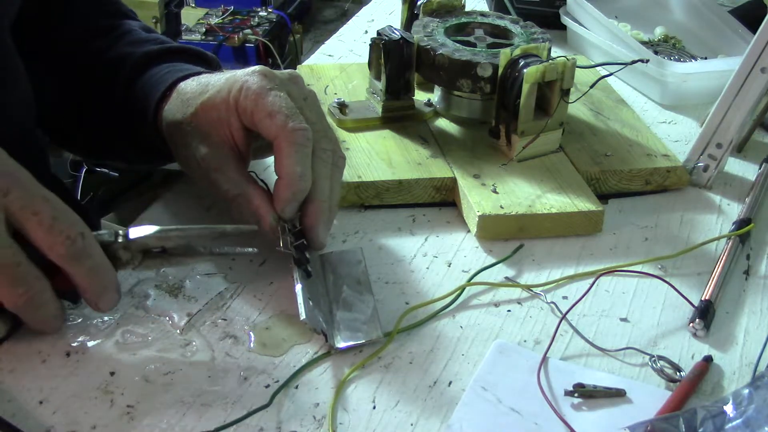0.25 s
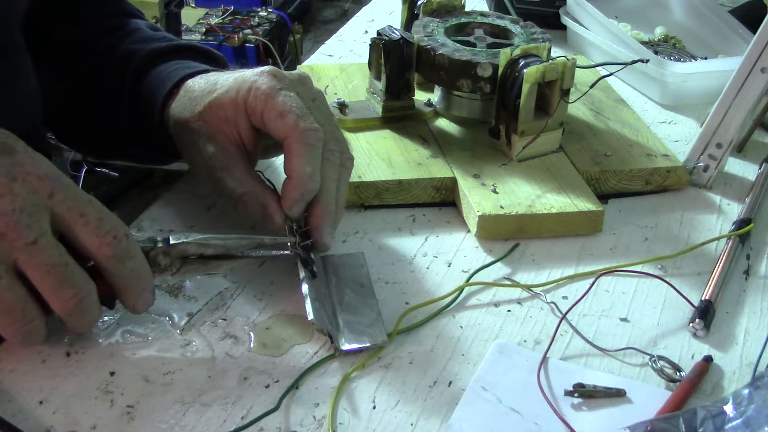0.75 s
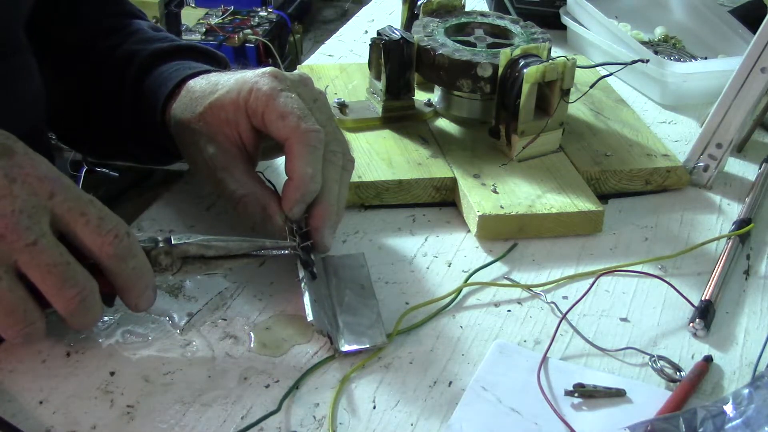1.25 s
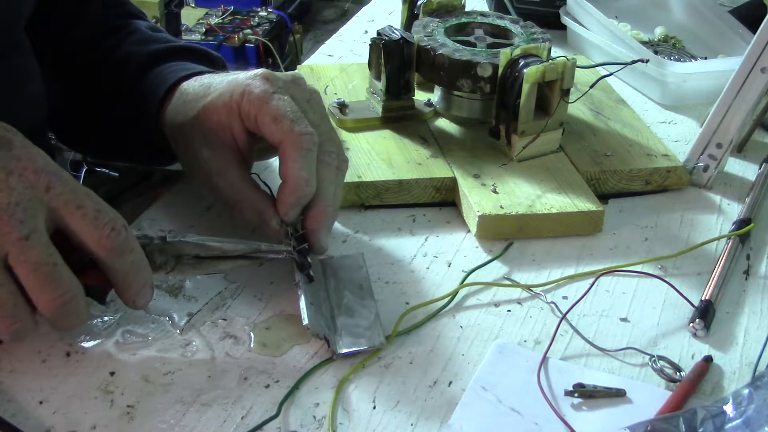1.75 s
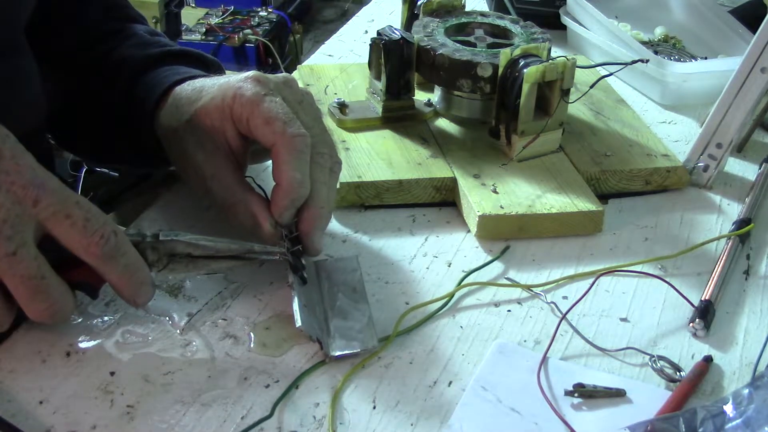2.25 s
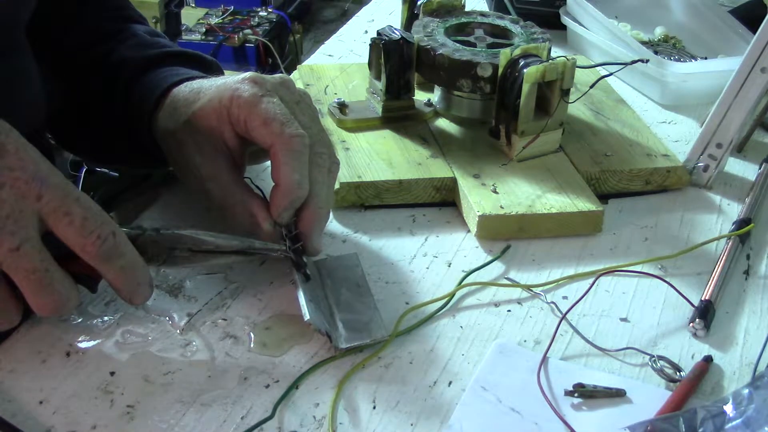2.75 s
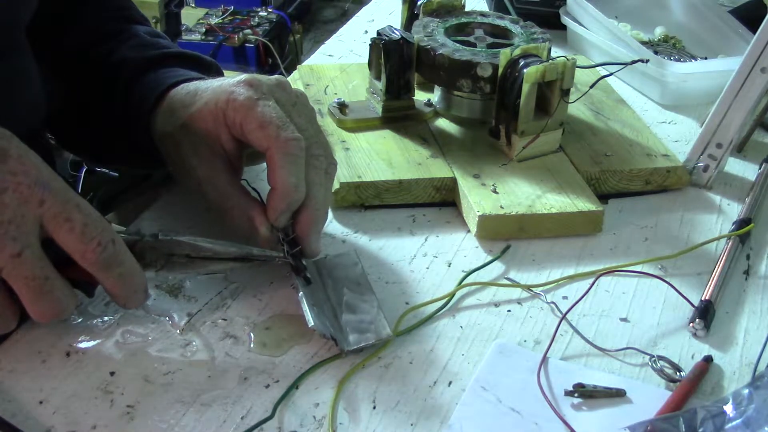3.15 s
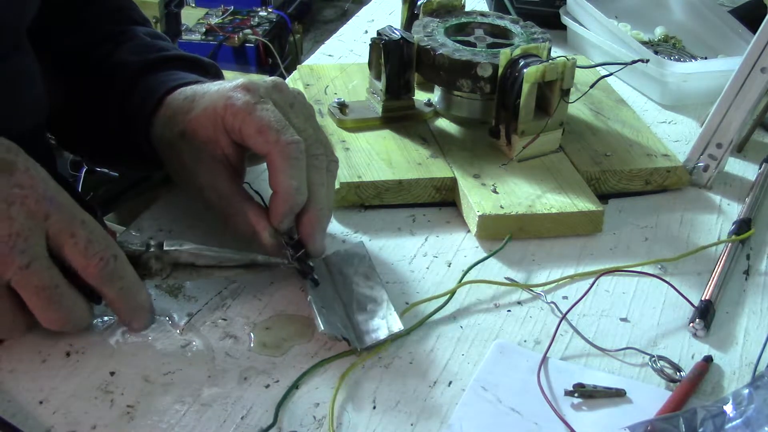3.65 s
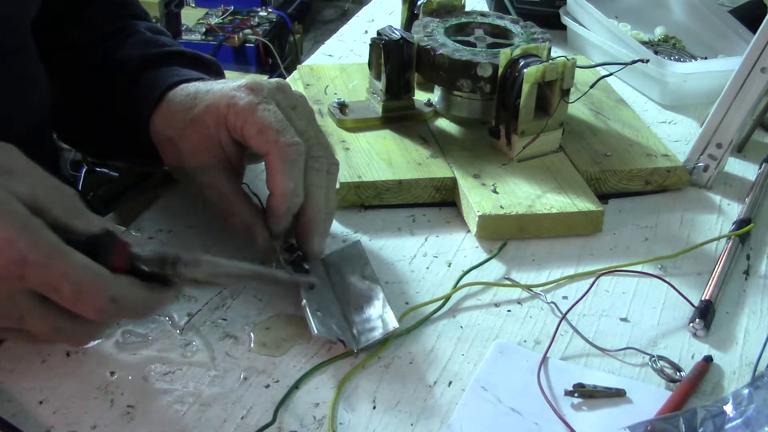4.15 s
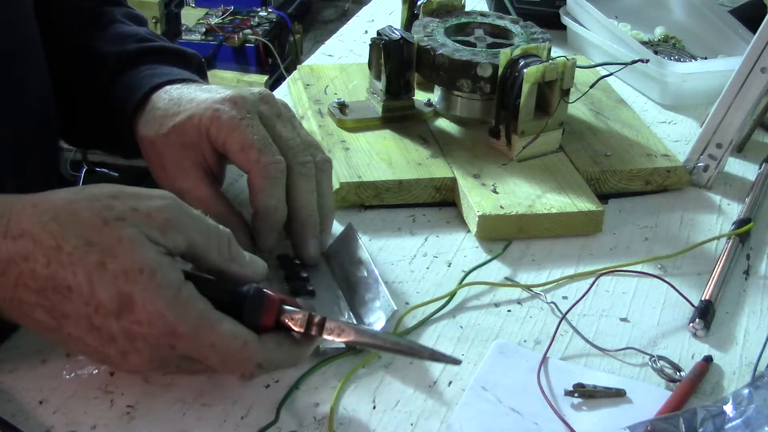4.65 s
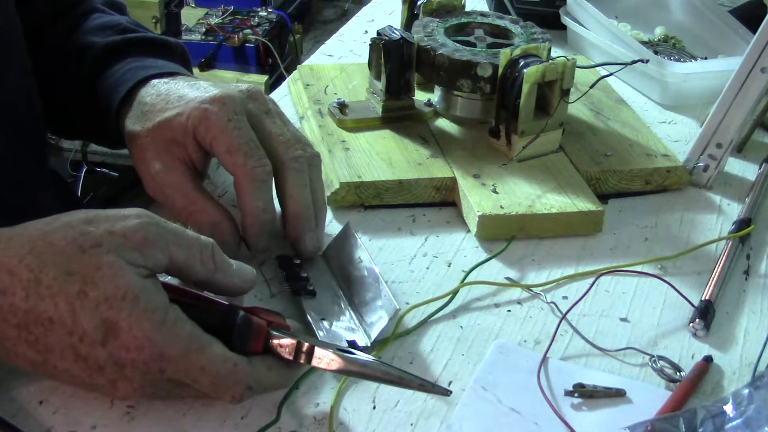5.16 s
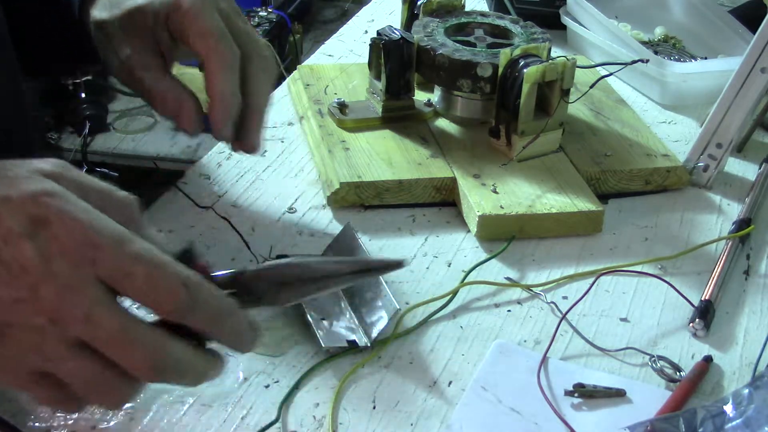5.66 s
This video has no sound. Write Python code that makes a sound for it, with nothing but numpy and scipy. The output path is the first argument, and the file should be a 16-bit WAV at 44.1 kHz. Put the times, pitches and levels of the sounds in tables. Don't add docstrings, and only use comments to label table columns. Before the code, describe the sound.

Steady mains buzz and room hiss while hands work a small metal bracket on a wooden bench with thumps, clicks, knocks and a squeak.

```python
import sys
import numpy as np
from scipy import signal
from scipy.fft import rfft, irfft, next_fast_len
from scipy.io import wavfile
from scipy.ndimage import uniform_filter1d

SR = 44100
rng = np.random.default_rng(int(sys.argv[2]) if len(sys.argv) > 2 else 0)


def waveform_to_disk(signal):
    frames = np.transpose(np.atleast_2d(signal))
    scaled = np.clip(frames, -1, 1) * 32767
    samples = np.round(scaled).astype(np.int16)
    wavfile.write(sys.argv[1], SR, samples)


def convert_level_to_amplitude(level_db):
    exponent = np.asarray(level_db, float) / 20
    return 10 ** exponent


N = 260631
T = np.arange(N) / SR
T_HIT = np.arange(SR // 4) / SR


def unit(x):
    return x / np.sqrt(np.mean(x ** 2) + 1e-20)


def along(points, hz):
    f, v = np.transpose(points)
    return np.interp(np.log(hz + 1), np.log(f + 1), v)


def curves(rows):
    s, *cols = np.transpose(rows)
    return [np.interp(T, s, c) for c in cols]


def filtered(x, response):
    m = next_fast_len(x.shape[-1] + 8192)
    spectrum = rfft(x, m) * response(np.fft.rfftfreq(m, 1 / SR))
    return irfft(spectrum, m)[..., :x.shape[-1]]


def hump(hz, centre_hz, octaves):
    return np.exp(-.5 * (np.log2((hz + 1) / centre_hz) / octaves) ** 2)


def ring(modes, attack_s, damping=1):
    hz, gain, t60 = np.transpose(modes)[:, :, None]
    luck_level, luck_pitch = rng.standard_normal((2, len(modes), 1))
    decay = convert_level_to_amplitude(2 * luck_level - 60 * (T_HIT / t60) ** damping)
    wave = gain * decay * np.sin(2 * np.pi * hz * (1 + luck_pitch / 100) * T_HIT)
    return wave.sum(0) * (1 - np.exp(-T_HIT / attack_s)) ** 2


def add(track, s, wave):
    part = track[round(s * SR):][:len(wave)]
    part += wave[:len(part)]


def ballast():
    # (time [s], frequency [Hz])
    mains = [(0, 60.007), (1, 60.007), (2, 60.016), (3, 60.008), (4.5, 60.008), (5.2, 60.017),
             (5.91, 60.017)]
    # (multiple of mains, level [dB rms])
    buzz = [(4, -58), (8, -64), (16, -64), (18, -60), (20, -60), (22, -66), (26, -70), (28, -72), (30, -71),
            (32, -65), (38, -65), (42, -79), (48, -75), (50, -73), (52, -72), (56, -81), (58, -78),
            (60, -73), (64, -76), (72, -71), (74, -81), (86, -74), (92, -82), (94, -83), (96, -75),
            (106, -79), (108, -86), (110, -85), (112, -86), (118, -84),
            (132, -87), (140, -89), (190, -92), (192, -95), (204, -94), (210, -93), (212, -92), (216, -83),
             (218, -90), (220, -94), (222, -87), (226, -88), (228, -94), (248, -93), (250, -96), (252, -94),
            (1, -86), (2, -81), (5, -74), (10, -72), (12, -77), (23, -81), (24, -76), (34, -84), (37, -84),
            (40, -78), (44, -85), (62, -84), (68, -85), (70, -85), (76, -81), (78, -85), (82, -86),
            (88, -87), (100, -88), (101, -87), (114, -87), (142, -89), (148, -91), (168, -92)]
    # (frequency [Hz], level [dB rms])
    faint = [(120, -90), (1400, -90), (3000, -90), (7000, -92), (10000, -97), (16000, -103)]
    k = np.arange(265)
    db = along(faint, 60 * k) + 3 * rng.standard_normal(265)
    db[1::2] -= 3
    for multiple, line_db in buzz:
        db[int(multiple)] = line_db
    db[0] = -200
    lines = convert_level_to_amplitude(db) * np.exp(-1j * np.pi * k ** 2 / 19.3) * np.sqrt(2)
    spread = convert_level_to_amplitude(-23 - 8 * k / 120) * np.exp(2j * np.pi * rng.random(265))
    cycles = irfft([lines * (1 + spread), lines * (1 - spread)], 8192) * 4096
    place = np.cumsum(curves(mains)[0]) / SR % 1 * 8192
    return np.array([np.interp(place, np.arange(8192), c, period=8192) for c in cycles])


def air():
    # (frequency [Hz], level [dB per Hz])
    colour = [(25, 0.5), (60, -3), (95, -7.5), (130, -2.5), (250, -0.5), (500, -4.5), (900, -7.5),
              (2000, -11.5), (4000, -17.5), (8000, -23), (12000, -31.5), (16000, -38)]
    # (time [s], level [dB])
    swell = [(0.0, -65), (3.36, -67.5), (3.67, -64.5), (3.92, -67), (4.49, -64), (4.66, -65), (4.81, -67),
             (5.6, -67), (5.91, -67)]
    # (frequency [Hz], side minus mid [dB])
    side_db = [(60, -3), (110, -7), (200, -9), (380, -5.5), (700, -6), (1290, -11.5), (2380, -4.5),
               (4400, -9.5), (8120, -10.5), (15000, -13)]

    def room_colour(hz):
        hum = 1 + 1.35 * hump(hz, 127, 0.028)
        mid_side = np.array([1 + 0 * hz, convert_level_to_amplitude(along(side_db, hz))])
        return convert_level_to_amplitude(along(colour, hz)) * (hz < 15750) * hum * mid_side

    z = signal.stft(rng.standard_normal((2, N)), nperseg=512)[2]
    patches = uniform_filter1d(uniform_filter1d(rng.standard_normal(z.shape[1:]), 6, 0), 14, 1)
    pair = signal.istft(z * convert_level_to_amplitude(1.2 * unit(patches)), nperseg=512)[1][:, :N]
    mid, side = filtered(pair, room_colour)
    return convert_level_to_amplitude(curves(swell)[0] + 9.5) * unit(np.array([mid + side, mid - side]))


def fan():
    # (time [s], level [dB])
    whir_level = [
        (0, -80),
        (2.9, -76),
        (3.2, -125),
        (5.91, -74),
    ]
    whir = filtered(rng.standard_normal(N), lambda hz: hump(hz, 1390, 0.046))
    return convert_level_to_amplitude(curves(whir_level)[0]) * unit(whir)


def rustles():
    # (time [s], level [dB], centre [Hz], half length [s])
    brushes = [
        (0.07, -61, 8000, 0.011),
        (0.384, -69, 7000, .01),
        (0.485, -66, 6000, 0.02),
        (4.34, -78, 10400, .03),
        (5.512, -64.5, 1010, 0.5),
        (5.3, -72.5, 3550, 0.5),
        (5.82, -65.5, 9000, 0.017),
    ]
    noise = rng.standard_normal(N)
    out = np.zeros(N)
    for s, db, centre_hz, half_s in brushes:
        swell = np.exp(-.5 * ((T - s) / half_s) ** 2)
        out += convert_level_to_amplitude(db) * swell * unit(filtered(noise, lambda f: hump(f, centre_hz, 0.42)))
    return out


def blows(events, modes, t60_s, rise_s, octaves):
    out = np.zeros(N)
    for s, db, hz in events:
        harder_db = db + 40
        t60, attack_s = t60_s * convert_level_to_amplitude(-0.1364 * harder_db), rise_s * convert_level_to_amplitude(0.2 * harder_db)
        picked = [(f, convert_level_to_amplitude(level) * (.08 + hump(f, hz, octaves)), t60 * share) for f, level, share in modes]
        wave = ring(picked, attack_s, damping=2)
        add(out, s, convert_level_to_amplitude(db) * wave / np.abs(wave).max())
    return out


def thumps():
    # (time [s], peak [dB], pitch [Hz])
    knuckles = [(0.189, -47, 227), (0.7945, -33, 193), (0.844, -44, 208), (0.898, -33, 202),
                (0.918, -47, 234), (0.927, -25.5, 216), (0.958, -45, 240), (1.8455, -25, 231),
                (2.107, -45, 198), (2.169, -32, 232), (2.254, -32, 256), (2.286, -41.5, 243),
                (2.374, -35, 237), (3.628, -22, 227), (3.635, -24.5, 261), (3.662, -33, 171),
                (3.74, -44, 216), (3.76, -36, 220), (3.799, -40.5, 227), (1.879, -47, 202),
                (4.466, -50.5, 184), (4.531, -43, 240), (4.561, -40.5, 200), (4.605, -28, 250),
                (4.658, -39, 247), (4.72, -31.5, 244), (4.767, -44, 247), (4.838, -36.5, 214),
                (4.986, -42, 244), (5.311, -48, 243)]
    # (frequency [Hz], level [dB], share of t60)
    bench = [(95, -3, 1.2), (137, 6, 1.7), (198, -1, 1.1), (243, 0, 1), (340, 8, .7)]
    return blows(knuckles, bench, t60_s=0.045, rise_s=0.0012, octaves=0.18)


def contact(s, db, top_hz, ring_hz, ring_db, rattle_db):
    # (frequency [Hz], t60 [s])
    bracket = [(1000, .025), (1300, .025), (1880, .025), (2250, .025), (2550, .03), (2750, .045),
               (3560, .02), (3900, .02), (5200, .02), (8400, .025)]
    grit, loose = rng.standard_normal((2, len(T_HIT)))
    rattle = filtered(loose * convert_level_to_amplitude(rattle_db - 60 * T_HIT / 0.075), lambda f: 1 / (1 + 1j * f / 6000) ** 2)
    burst = (T_HIT == 0) + .3 * grit * convert_level_to_amplitude(-60 * T_HIT / .004) + .4 * rattle

    def dulling(f):
        low_cut = 1j * f / (900 + 1j * f)
        return low_cut / (1 + 1.5j * f / top_hz - (f / top_hz) ** 2) ** 2

    crack = filtered(burst, dulling)
    sheet = ring([(f, hump(f, ring_hz, .2), t60) for f, t60 in bracket], .0002)
    out = np.zeros(N)
    add(out, s, convert_level_to_amplitude(db) * (crack / np.abs(crack).max() + convert_level_to_amplitude(ring_db) * sheet))
    return out


def snaps():
    # (time [s], crack peak [dB], crack top [Hz], ring [Hz], ring level [dB])
    wire = [(0.79, -48, 9000, 5200, -14), (0.9187, -46, 6000, 5200, -5), (1.301, -40.5, 6050, 4000, -13),
            (1.9763, -33, 6050, 5000, -10), (2.1244, -39, 6000, 3500, -26),
            (2.1713, -21.5, 8000, 1130, -6.5), (2.869, -46, 14000, 8000, -19),
            (2.921, -44.5, 13000, 8000, -17), (3.6307, -14, 8700, 8400, -17), (3.632, -29, 5000, 3970, 1.5),
            (3.7395, -40, 9000, 8400, -17), (4.6683, -25.5, 6200, 2270, -16.5),
            (5.4154, -54, 6100, 3480, -12)]
    return sum(contact(*row, rattle_db=-10.5) for row in wire)


def jaws():
    # (time [s], peak [dB], low modes [dB], long mode [dB])
    ticks = [
        (0.7904, -34.5, -13.5, -1),
        (0.897, -50, -2, -8),
        (0.9203, -45, -10, -5),
        (3.7379, -42, -10, -19),
        (3.8003, -50, -14, -12),
        (3.812, -55.5, -11, -12),
        (4.3394, -57, -8, -8),
        (4.8344, -57, -6, -8),
        (5.1686, -51.5, -8, -4),
    ]
    # (frequency [Hz], level [dB], t60 [s])
    steel = [(6200, 1, 0.015), (6880, -3, 0.11), (8000, -2, 0.014), (9000, -4, 0.018), (10470, -7, 0.026)]
    out = np.zeros(N)
    for s, db, low_db, long_db in ticks:
        modes = []
        for f, level, t60 in steel:
            modes.append((f, convert_level_to_amplitude(level + low_db * (f < 1e4) + long_db * (t60 > .06)), t60))
        add(out, s, convert_level_to_amplitude(db + 3.0) * ring(modes, 0.00024))
    return out


def knocks():
    # (time [s], peak [dB], pitch [Hz])
    hits = [(0.919, -35, 400), (0.928, -43, 428), (1.849, -30.5, 460), (1.983, -55, 493),
            (2.13, -46.5, 493), (2.173, -32.5, 614), (2.259, -42.5, 493), (2.38, -39, 473),
            (3.494, -47, 497), (3.614, -33, 530), (3.63, -32, 560), (3.637, -20, 484), (3.689, -39, 495),
            (3.739, -38.5, 530), (3.764, -36.5, 500), (4.243, -38.5, 556), (4.462, -42, 576),
            (4.516, -38.5, 425), (4.565, -40.5, 503), (4.606, -39, 680), (4.63, -25.5, 532),
            (4.669, -44, 563), (4.721, -41, 660), (4.78, -38.5, 480), (4.838, -36.5, 535),
            (4.986, -33, 540), (5.017, -36.5, 545), (5.18, -50, 479), (5.285, -44.5, 501),
            (5.302, -35, 517)]
    # (frequency [Hz], level [dB], share of t60)
    board = [(415, -4, .7), (505, 0, 1.3), (590, -1, .8), (688, 1, .8)]
    return blows(hits, board, t60_s=0.038, rise_s=0.00058, octaves=.21)


def scrape():
    # (start [s], length [s], rasp [dB], wood [dB])
    strokes = [
        (3.633, 0.025, -41.5, -43),
        (3.638, 0.084, -75, -44),
        (3.705, 0.15, -67, -53.5),
        (4.417, 0.24, -62, -52),
        (4.647, 0.28, -65.5, -55.5),
        (4.946, 0.56, -68, -60.5),
        (5.722, 0.32, -77, -71),
    ]
    grain = convert_level_to_amplitude(3.5 * unit(uniform_filter1d(rng.standard_normal(N), 90)))
    grit = rng.standard_normal(N) * grain
    rasp = unit(filtered(grit, lambda f: hump(f, 3700, .72) + .7 * hump(f, 8400, .03) + .9 * hump(f, 5150, .03)))
    wood = unit(filtered(grit, lambda f: hump(f, 500, .12) + .8 * hump(f, 220, .3) + .4 * hump(f, 750, .5)))
    out = np.zeros(N)
    for s, length, rasp_db, wood_db in strokes:
        ramp_s = 0.24 * length
        speed = np.clip(np.minimum(T - s, s + length - T) / ramp_s, 0, 1)
        out += speed * (convert_level_to_amplitude(rasp_db) * rasp + convert_level_to_amplitude(wood_db) * wood)
    return out


def jolts():
    # (time [s], crack peak [dB], ring [Hz], ring level [dB])
    chatter = [
        (3.661, -30, 3900, -14),
        (3.683, -31.5, 2750, -5),
        (3.6848, -27, 8400, -12),
        (3.7567, -36, 2220, 0.5),
        (4.563, -32, 2800, -5),
        (4.7685, -33.5, 2500, -16),
        (4.7885, -43.5, 2180, 0),
        (5.1677, -37, 2140, -6),
    ]
    return sum(contact(s, db, 6900, hz, ring_db, rattle_db=-5) for s, db, hz, ring_db in chatter)


def squeak():
    # (time [s], slip rate [Hz], level [dB])
    glide = [
        (4.018, 1567, -66),
        (4.028, 1740, -48),
        (4.035, 1945, -49),
        (4.039, 2000, -42),
        (4.043, 2060, -45),
        (4.05, 2260, -68),
        (4.056, 2250, -75),
    ]
    # (multiple of slip rate, level [dB])
    overtones = [(2, 8.5), (3, -0.5), (4, -16)]
    # (frequency [Hz], width [Hz], level [dB])
    resonances = [(2050, 74, 15), (2060, 27, 15)]
    hz, db = curves(glide)
    phase = 2 * np.pi * np.cumsum(hz) / SR
    slip = convert_level_to_amplitude(db) * (T > glide[0][0]) * (T < glide[-1][0])

    def modes(f):
        return 1 + sum(convert_level_to_amplitude(g) * 1j * f * w / (c * c - f * f + 1j * f * w) for c, w, g in resonances)

    fade = np.clip((4.046 - T) / 0.024, 0, 1) * np.clip((T - 4.021) / 0.013, 0, 1)
    upper = sum(convert_level_to_amplitude(g) * np.sin(k * phase) for k, g in overtones)
    return filtered(slip * np.sin(phase), modes) + slip * fade * upper


def taps():
    # (time [s], crack peak [dB], crack top [Hz], ring level [dB])
    edge_taps = [
        (4.242, -46, 1200, -10),
        (4.606, -36, 2000, -6),
        (4.631, -37.5, 2500, 6),
        (4.721, -40.5, 2500, 4.5),
        (4.841, -43, 1800, -13),
        (4.987, -47, 1490, -21),
        (5.301, -49, 1840, -8),
    ]
    return sum(contact(s, db, top_hz, 1080, ring_db, rattle_db=-11) for s, db, top_hz, ring_db in edge_taps)


def shop(x):
    # (frequency [Hz], t60 [s])
    room_t60 = [(150, .3), (2000, .19), (10000, .07)]
    hz, t, z = signal.stft(rng.standard_normal((2, SR // 2)), SR, nperseg=256)
    decay = convert_level_to_amplitude(-60 * t / along(room_t60, hz)[:, None])
    width = np.array([1 + 0 * hz, along([(500, 0.04), (6000, 0.45)], hz)])[:, :, None]
    mid, side = signal.istft(z * decay * width, SR, nperseg=256)[1]
    tail = np.array([mid + side, mid - side]) / np.linalg.norm(mid)
    return signal.fftconvolve(np.pad(x, (200, 0))[None], tail, axes=1)[:, :N]


def scene():
    wood = thumps() + knocks()
    metal = rustles() + snaps() + jaws() + scrape() + jolts() + taps()
    glide = squeak()
    echoed = convert_level_to_amplitude(-13.5) * wood + convert_level_to_amplitude(-11) * metal + convert_level_to_amplitude(-12) * glide
    close = (wood + metal + glide) * convert_level_to_amplitude([[-.15], [.15]])
    background = convert_level_to_amplitude([[-.3], [.3]]) * (ballast() + air() + fan())
    return close + shop(echoed) + background


def low_pass(x):
    return signal.sosfilt(signal.butter(12, 16520, fs=SR, output="sos"), x)


def record(dry):
    low_cut = signal.butter(2, 110, "high", fs=SR, output="sos")
    return low_pass(signal.sosfilt(low_cut, dry))


dry = scene()
out = record(dry)
waveform_to_disk(out)
```